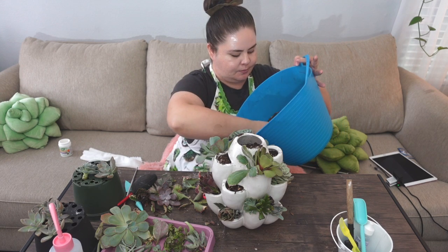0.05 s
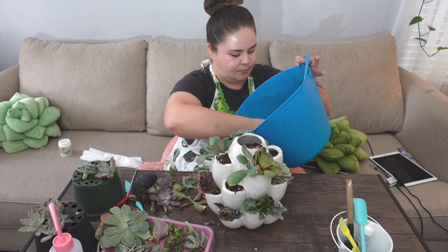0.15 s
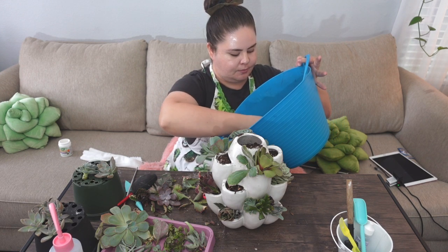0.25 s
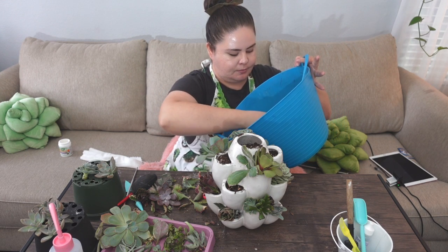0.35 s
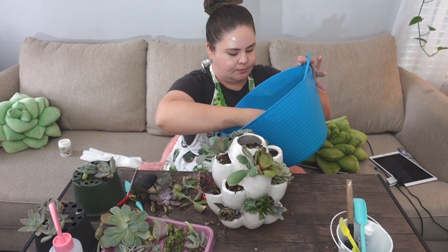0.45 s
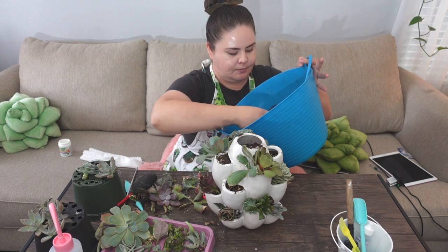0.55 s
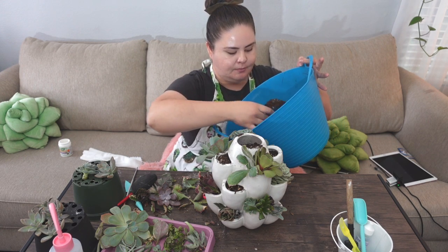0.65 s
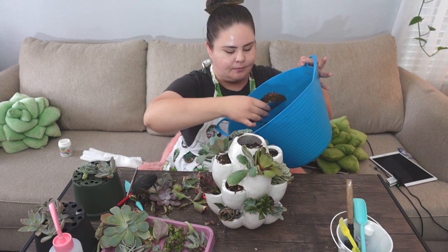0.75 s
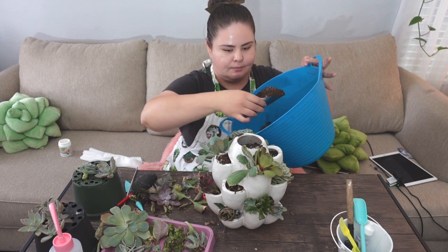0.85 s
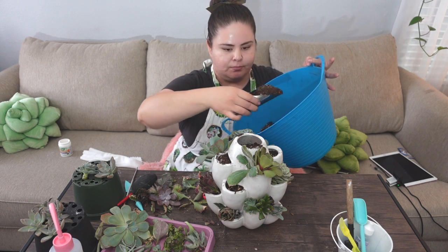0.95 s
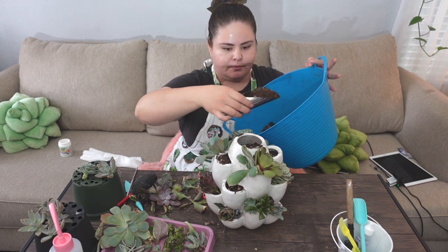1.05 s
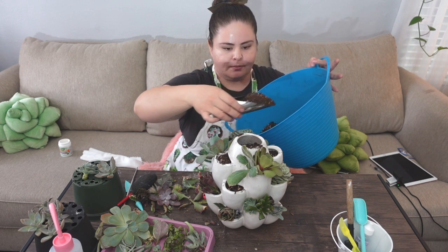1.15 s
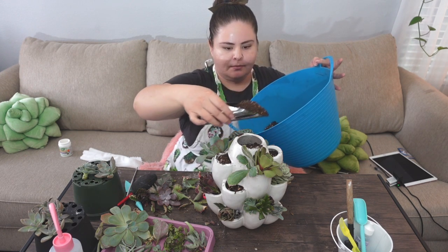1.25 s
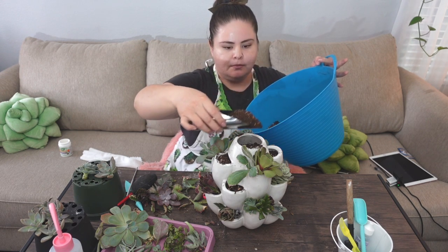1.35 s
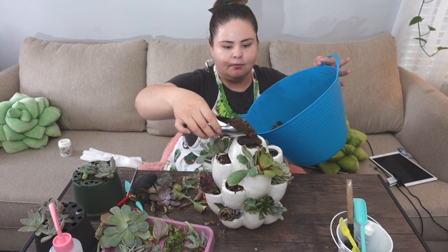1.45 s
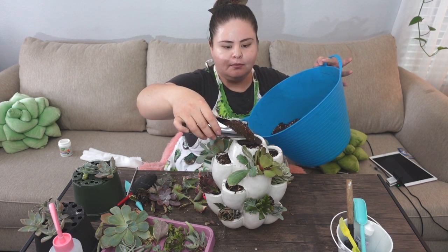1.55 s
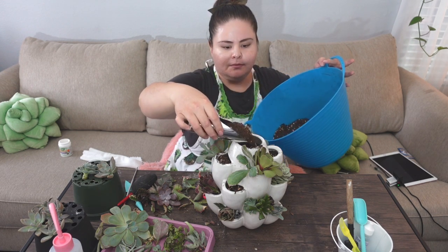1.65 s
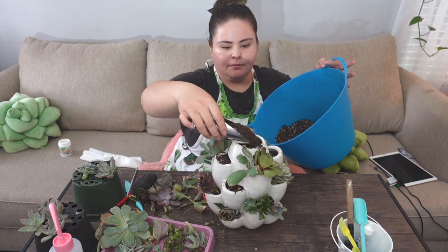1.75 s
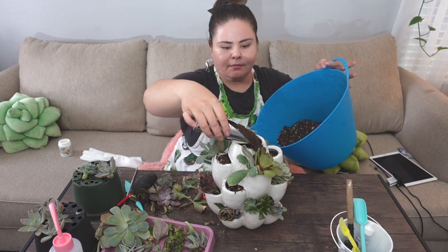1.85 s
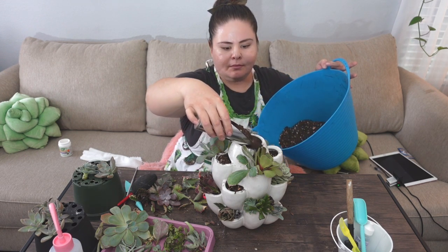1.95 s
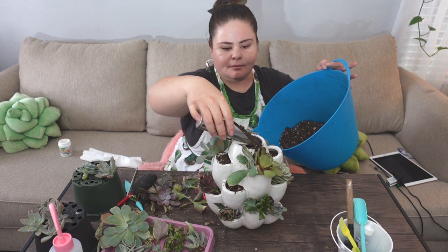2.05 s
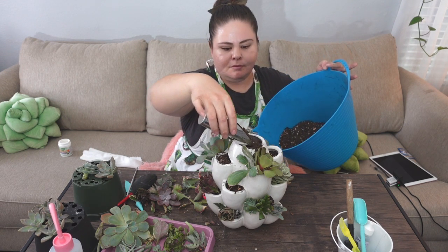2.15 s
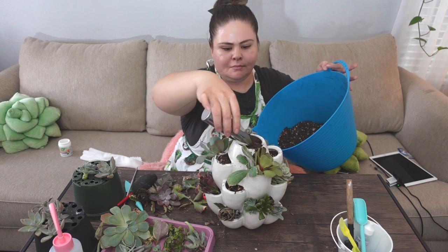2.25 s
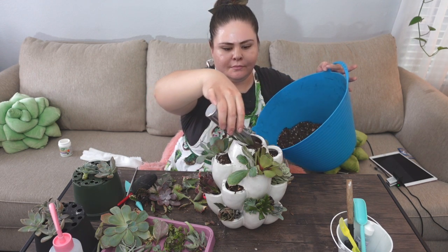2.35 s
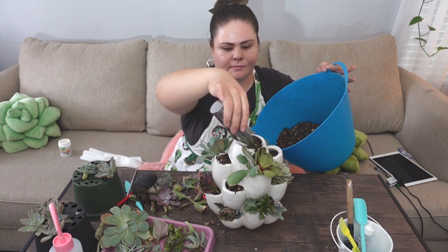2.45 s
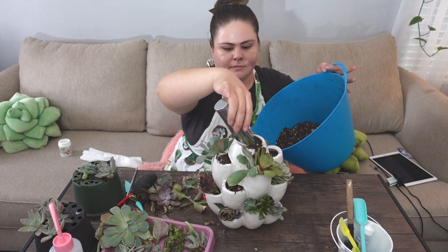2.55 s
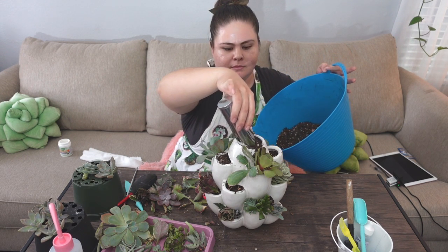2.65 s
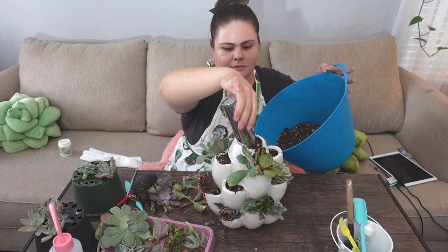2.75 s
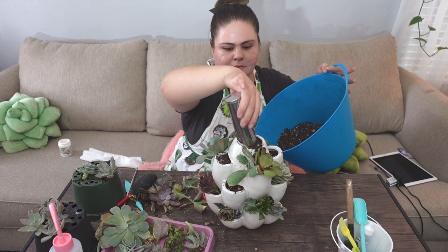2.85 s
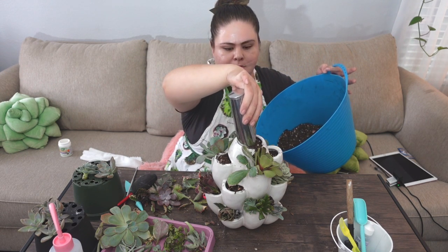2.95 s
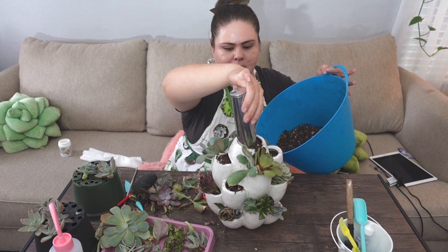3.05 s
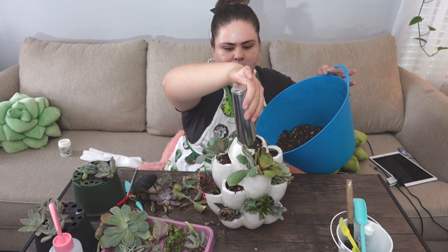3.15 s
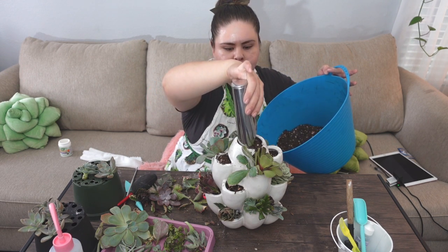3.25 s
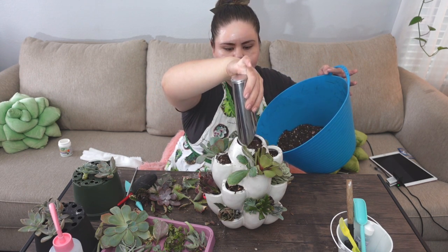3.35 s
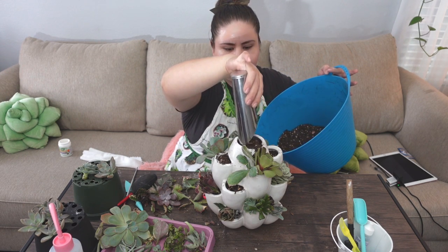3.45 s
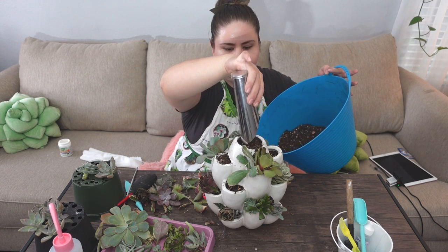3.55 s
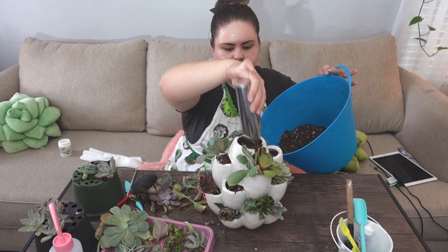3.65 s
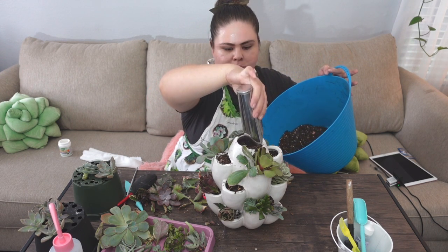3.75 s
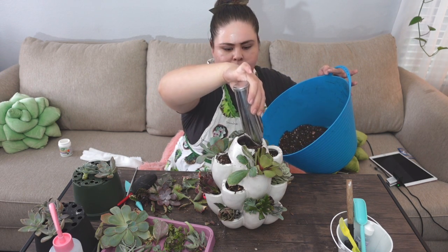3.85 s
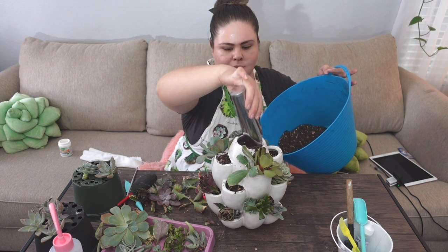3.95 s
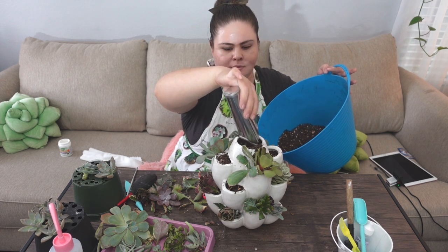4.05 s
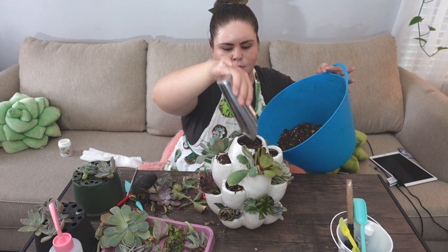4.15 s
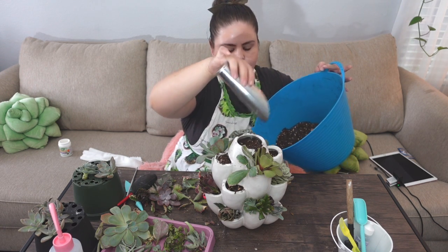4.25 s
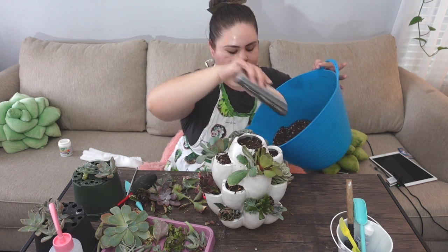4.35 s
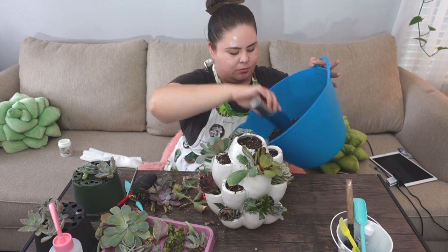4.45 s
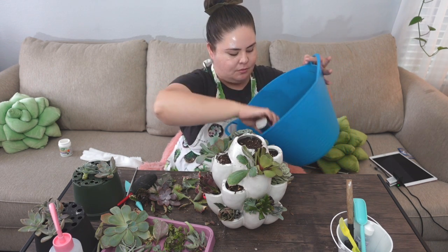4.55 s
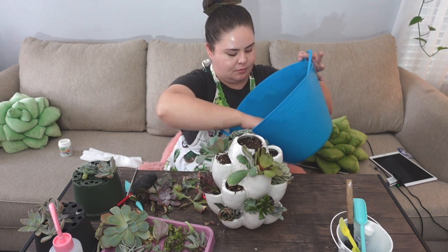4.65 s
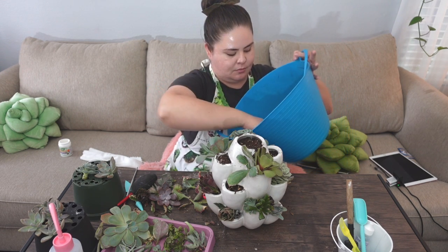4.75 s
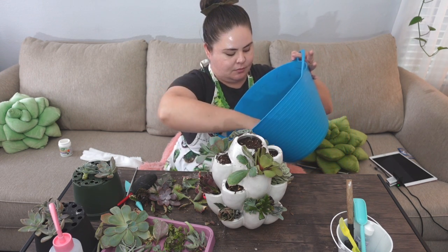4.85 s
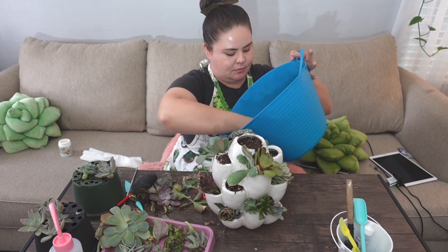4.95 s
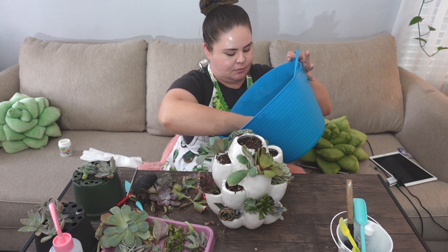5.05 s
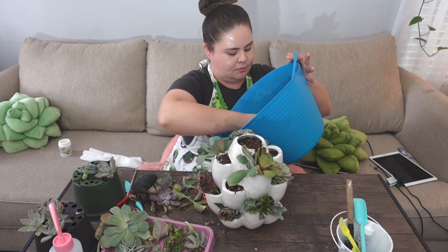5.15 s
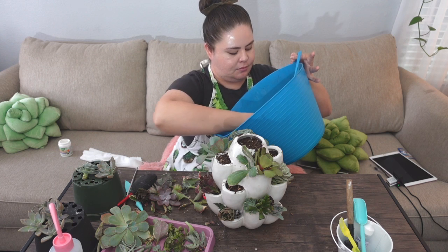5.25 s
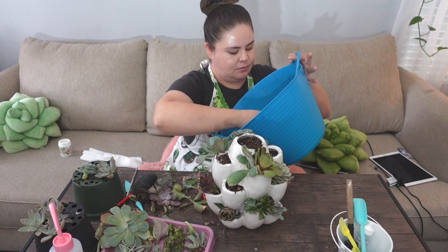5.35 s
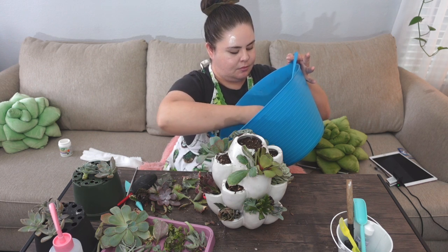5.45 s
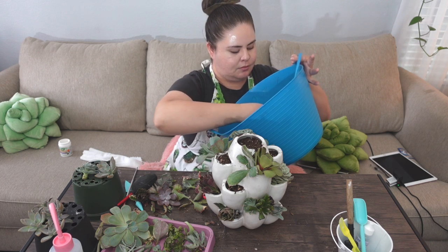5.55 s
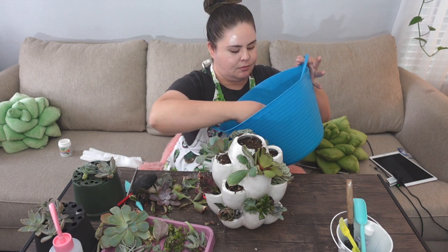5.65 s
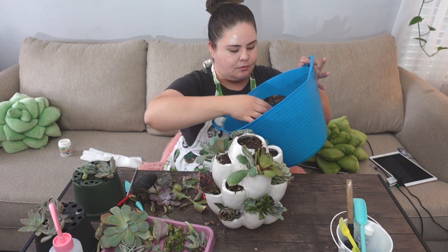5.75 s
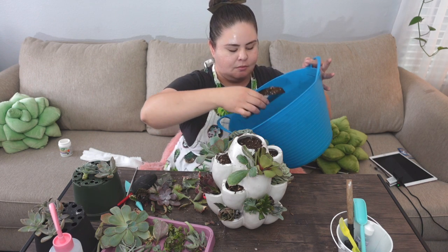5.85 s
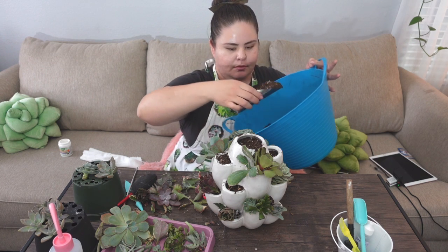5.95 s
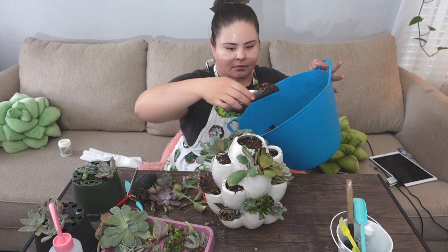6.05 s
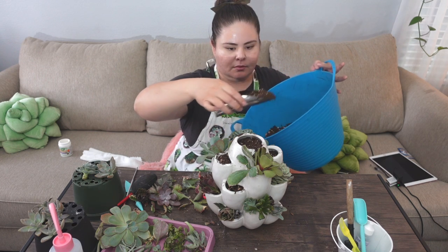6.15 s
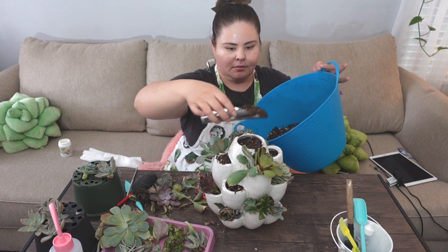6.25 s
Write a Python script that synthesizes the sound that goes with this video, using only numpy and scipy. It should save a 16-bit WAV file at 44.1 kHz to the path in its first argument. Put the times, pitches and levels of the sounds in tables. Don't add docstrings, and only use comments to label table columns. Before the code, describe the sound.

Indoors, a steel scoop digs soil from a booming soft plastic tub, rings faintly, taps a planter rim while emptying, and digs again.

```python
import sys
import numpy as np
from scipy import signal
from scipy.fft import rfft, irfft, next_fast_len
from scipy.io import wavfile

SR = 44100
rng = np.random.default_rng(int(sys.argv[2]) if len(sys.argv) > 2 else 0)


def boost(x):
    u = np.asarray(x, float) / 20
    return 10 ** u


def dump(signal):
    limited = np.clip(np.atleast_2d(signal).T, -1, 1)
    pcm = np.round(limited * 32767).astype(np.int16)
    wavfile.write(sys.argv[1], SR, pcm)


N = 277874


def at_hz(points, hz):
    point_hz, value = np.transpose(points)
    return np.interp(np.log(hz), np.log(point_hz), value)


def rms_one(x):
    return x / np.sqrt(np.mean(x ** 2) + 1e-20)


def high_pass(x, order, hz):
    return signal.sosfilt(signal.butter(order, hz, "high", fs=SR, output="sos"), x)


def drift(rate):
    r = np.exp(-80 * np.pi * rate / SR)
    slow = signal.lfilter([1], [1, -2 * r, r * r], rng.standard_normal(N // 40 + 2002))[2000:]
    return np.interp(np.arange(N) / 40, np.arange(len(slow)), rms_one(slow))


def ring(clicks, hz, t60):
    r = boost(-60 / (t60 * SR))
    w = 2 * np.pi * hz / SR
    return signal.lfilter([0, np.sin(w)], [1, -2 * r * np.cos(w), r * r], clicks + 1e-18)


def blip(clicks, hz, t60):
    return 2 * np.e * (1 - boost(-60 / (t60 * SR))) * ring(ring(clicks, hz, t60), hz, t60)


def strike(times, db, modes, voice=ring, smear_s=.0003, size=N, agree=0):
    out = np.zeros(size)
    luck = rng.standard_normal((len(times), len(modes), 3))
    for k, (hz, mode_db, t60) in enumerate(modes):
        clicks = np.zeros(size)
        late_s = smear_s * np.abs(luck[:, k, 2])
        at = ((np.asarray(times) + late_s) * SR).astype(int)
        sign = np.sign(luck[:, k, 1] + agree)
        clicks[at] = boost(db[:, k] + mode_db + 1.5 * luck[:, k, 0]) * sign
        out += voice(clicks, hz, t60)
    return out


def cracks(s, peak_db, low_db, mid_db, high_db, linger_s):
    pitches = np.geomspace(600, 14500, 22)
    colour = []
    for low, mid, high in zip(low_db, mid_db, high_db):
        spectrum = [(600, low - 6), (1000, low + 3), (2600, -11.5),
                    (5300, mid - 1.5), (11000, high - 3), (15000, high - 13)]
        colour.append(at_hz(spectrum, pitches))
    modes = [(hz, -6, 5 / hz + linger_s) for hz in pitches]
    return strike(s, peak_db[:, None] + np.array(colour), modes, blip, smear_s=linger_s / 5, agree=.9)


def grains(per_s, spread_db, clump_db):
    born = rng.random(N) < per_s * boost(clump_db * drift(25)) / SR
    size = boost(spread_db * np.minimum(rng.exponential(1, N), 5))
    return rms_one(born * size * rng.choice([-1, 1], N))


def body(clicks, modes, longest_s):
    out = np.zeros(N)
    for hz, db, t60 in modes:
        out += boost(db + 3 * drift(6)) * blip(clicks, hz, min(t60, longest_s) / 1.5) / t60
    return rms_one(out)


def crackle(clicks, spectrum, cycles):
    pitches = np.geomspace(spectrum[0][0], 15500, 20)
    dealt = rng.integers(0, 20, N)
    out = np.zeros(N)
    for k, hz in enumerate(pitches):
        out += boost(at_hz(spectrum, hz)) * hz * blip(clicks * (dealt == k), hz, cycles / hz)
    return rms_one(out)


def swells(rows, over_db=0, lag_s=.004):
    s, db, rise_ms, fall_ms = np.array(rows)[:, :4].T[:, :, None]
    ms = 1000 * (np.arange(0, N + 32, 32) / SR - s - lag_s * (s > 0))
    away = np.where(ms < 0, -ms / np.abs(rise_ms), ms / np.abs(fall_ms))
    db = db + np.reshape(over_db, (-1, 1)) - 20 * away
    level = np.sqrt(np.sum(boost(db) ** 2, axis=0))
    return np.interp(np.arange(N) / 32, np.arange(ms.shape[1]), level)


def add(out, s, sound):
    at = int(s * SR)
    out[at:at + len(sound)] += sound[:N - at]


def bands(shape_of, alike_at, length):
    out = 0
    edges = 35 * 2 ** np.arange(0, 9.1, .4)
    white = rng.standard_normal((2, 2, length))
    for k, (low, high) in enumerate(zip(edges, edges[1:])):
        band = signal.butter(2, [low, high], "band", fs=SR, output="sos")
        mid, side = signal.sosfilt(band, white[k % 2])
        hz = np.sqrt(low * high)
        alike = np.clip(alike_at(hz), 0, 1)
        pair = np.sqrt(1 + alike) * mid + np.sqrt(1 - alike) * side * [[1], [-1]]
        out = out + shape_of(hz) * pair
    return out


# time of the peak in seconds, crunch level in dB, rise over 20 dB
# in ms, fall over 20 dB in ms, grit on steel in dB over the crunch.
SHOVES = [(0.0, -25.5, 5, 33, -13), (0.038, -44, 20, 127, -7.5), (0.26, -60.5, 283, 145, 0),
          (0.462, -57, -2, 64, 6), (0.61, -64, 107, 27, 1.5), (0.891, -65, -3, 63, 7),
          (0.974, -61, 15, 302, -1), (1.28, -76, 28, 1, -39), (1.631, -45, 6.5, 77, -8),
          (1.8, -66, 300, 103, -2.5), (4.588, -38, 5.5, 139, -2), (4.671, -44.5, 46, 30, 5.5),
          (4.695, -53, 10, 171, 7.5), (4.845, -50.5, 42, 209, 7), (4.901, -42.5, 135, 265, -5),
          (5.275, -57.5, 456, 80, -8), (5.36, -74.5, 99, 207, 20.5), (5.434, -65.5, 48, 250, 6),
          (5.5, -60.5, 75, 18, 7)]
# time of the peak in seconds, level in dB, rise and fall over 20 dB
# in ms.
FLEXES = [
    (0.0, -38, 1, 117),
    (0.26, -67, 399, 47),
    (1.656, -76, 17, 71),
    (1.82, -71, 100, 40),
    (4.59, -27, 5, 200),
    (4.672, -23, 20, 35),
    (4.7, -47, 25, 73),
    (4.902, -39.5, 35, 168),
    (5.28, -56, 505, 48),
]
# mode in Hz, level in dB, T60 in seconds.
WALL_MODES = [(606, -26.5, 0.06), (780, -15, 0.038), (910, -0.5, 0.019), (1088, 0.5, 0.017),
              (1213, 2, 0.0089), (1438, 5.5, 0.014), (1550, -12, 0.025), (1795, 3, 0.018),
              (2153, -9, 0.015)]
# mode in Hz, level in dB, T60 in seconds.
BOOM_MODES = [(237, -4, 0.06), (287, 4.5, 0.14), (323.5, 10.5, 0.14), (377, 3.5, 0.07), (397, -2.5, 0.033),
              (460, -4.5, 0.027), (501, -12.5, 0.068)]
# frequency in Hz, level in dB per Hz.
GRIT_SPECTRUM = [(240, -41), (400, -26), (460, -81), (666, -20), (1730, 2), (3160, 0), (3520, -1),
                 (7510, -6), (16000, -27.5)]
# mode in Hz, level in dB, T60 in seconds.
HELD_STEEL = [(2690, -5, .028), (3590, -11, .012), (4500, -7, .02), (4650, -8, .022), (4870, -8, .03),
              (5240, -6, .02), (5550, -7, .014), (6200, -8, .014), (6690, -4, .02), (7250, -8, .02),
              (7900, -9, .016), (8720, -9, .018), (10200, -13, .014), (10800, -13, .02)]


def digging():
    wall = body(grains(5000, 2.8, 2.0), WALL_MODES, .014)
    boom = body(grains(900, 2.5, 2.5), BOOM_MODES, .1)
    grit = grains(16000, 2.2, 2.0)
    bright = crackle(grit, GRIT_SPECTRUM, cycles=7.6) + boost(-12.0) * body(grit, HELD_STEEL, 0.013)
    grit_db = np.array(SHOVES)[:, 4]
    out = boost(-4.0) * swells(SHOVES) * wall
    out += boost(-13.5) * swells(FLEXES) * boom
    return out + boost(-2.5) * swells(SHOVES, grit_db) * bright


# frequency in Hz, level in dB per Hz.
HISS_SPECTRUM = [(24, -79), (40, -87), (215, -23.5), (237, -16.5), (556, -13.5), (733, -4), (1070, -3.5),
                 (1370, -9.5), (1760, 1), (2260, -10.5), (3470, -12), (3930, -12.5), (16000, -22)]
# frequency in Hz, left-right likeness up to 1 (below 0 counts as 0).
HISS_LIKENESS = [(60, 0.45), (180, 0.52), (550, -0.4), (1650, -0.51), (4970, -0.53), (15000, 0.82)]


def hiss():
    noise = bands(lambda hz: boost(at_hz(HISS_SPECTRUM, hz)), lambda hz: at_hz(HISS_LIKENESS, hz), N)
    return boost(-64.5) * rms_one(noise)


# centre in Hz, width in Hz, level in dB.
DUCT = [(760, 99, 1.5), (1392, 137, 0), (1958, 40, 0.5), (2238, 220, 6)]


def fan():
    mid, side = rng.standard_normal((2, N))
    air = mid + side * [[1], [-1]]
    out = 0
    for hz, width, db in DUCT:
        out = out + boost(db + 0.98 * drift(3.7)) * rms_one(blip(air, hz, 1.97 / width))
    return boost(-65) * rms_one(out)


# time in seconds, level in dB, rise and fall over 20 dB
# in ms.
RUMBLES = [
    (0.0, -99, 500, 900),
    (1.9, -102, 2495, 2000),
    (4.78, -99, 400, 897),
    (6.3, -104, 500, 500),
]


def low_rumble():
    road = rms_one(blip(rng.standard_normal(N), 92, 0.041))
    return (boost(-108) + swells(RUMBLES)) * road


def thuds(rows):
    out = np.zeros(N)
    click = np.arange(SR // 4) == 0
    for s, db, hz, t60 in rows:
        add(out, s, boost(db - 6) * blip(click, hz, abs(t60)))
    return high_pass(out, 4, 170)


# time in seconds, peak in dB, pitch in Hz, T60 in seconds.
JAMS = [(0.002, -33, 1323, 0.035), (0.004, -36, 1150, 0.027), (0.002, -42, 744, 0.054),
        (0.002, -40.5, 1620, 0.017), (0.021, -36, 1416, 0.041), (0.03, -43, 1034, 0.039),
        (0.045, -43, 870, 0.044), (0.464, -40, 1480, 0.009), (4.589, -21.5, 1075, 0.016),
        (4.6, -37, 860, .025), (4.59, -25, 2180, 0.013), (4.592, -26, 760, 0.015), (4.663, -28, 610, 0.012),
        (4.6675, -33, 340, 0.024), (4.669, -28, 1550, 0.013), (4.6675, -21.5, 523, 0.016),
        (4.6675, -23, 712, 0.016), (4.668, -23, 965, 0.011), (4.695, -33, 319, 0.031),
        (4.8325, -36, 710, 0.015), (4.85, -35, 1230, 0.011), (4.902, -42, 780, 0.016),
        (4.908, -32.5, 706, 0.023), (4.925, -39, 933, 0.026), (5.284, -38, 1190, 0.011),
        (5.429, -45, 1160, 0.014), (5.482, -50, 910, 0.021)]


def jams():
    return thuds(JAMS)


# time in seconds, rms in dB, rise and fall over 20 dB in ms, centre in Hz.
RASPS = [(.012, -43, 40, 190, 1070), (.172, -56, 6, 60, 5500), (4.835, -50, 4, 40, 1300),
         (3.26, -66, 200, 200, 4200), (4.596, -41, 8, 70, 1080), (4.596, -48, 8, 90, 4300),
         (4.9, -55, 90, 120, 2700), (3.965, -50, 15, 90, 4700), (2.77, -70, 150, 250, 4900),
         (2.8, -74, 200, 200, 8800), (2.885, -62, 90, 170, 5200), (2.9, -72, 120, 150, 11500),
         (3.38, -58, 8, 80, 7900), (4.645, -46, 80, 60, 780), (4.73, -52, 80, 120, 760),
         (4.99, -53, 60, 120, 1200), (5.34, -62, 12, 150, 3700)]


def rasping():
    grit = [grains(7000, 3.0, 2.5), grains(7000, 3.0, 2.5)]
    out = np.zeros(N)
    for k, row in enumerate(RASPS):
        hz = row[4]
        out += swells([row]) * rms_one(blip(grit[k % 2], hz, 18 / hz))
    return out


# time in seconds, peak in dB, weight (under 1.5 kHz) in dB,
# hardness (over 8 kHz) in dB.
LUMPS = [(0.096, -33.5, -20, -25), (0.441, -40, -16, -24), (0.466, -37.5, -30.5, -25),
         (0.892, -32.5, -17, -33), (0.976, -33.5, -19.5, -36), (1.014, -33.5, -26, -47),
         (1.13, -42, -24, -30), (1.223, -54.5, -41, -28), (4.589, -16, -20, -32), (4.595, -35, -1, -30),
         (4.603, -30, -10, -30), (4.668, -31, -16, 2), (4.697, -34, -24, 0), (4.833, -36, -14, -14),
         (4.848, -37, -22, 3), (4.852, -47, -12, -8), (4.898, -24, -18, -17), (4.903, -27, -11, -19),
         (4.928, -32, -16, -15), (5.285, -32, -21.5, -35), (5.296, -41, -35, -30), (5.425, -45, -45, -30),
         (5.431, -38, -34, -12)]
# delay in seconds, level in dB.
TUB_ECHOES = [(.0045, -4), (.0076, -9), (0.012, -6.5)]


def lumps():
    s, db, low, high = np.transpose(LUMPS)
    edge_db = np.minimum(-21.5 - 0.51 * low, -3)
    direct = cracks(s, db, low, edge_db, high, linger_s=.001)
    out = direct.copy()
    for late, echo_db in TUB_ECHOES:
        out += boost(echo_db) * np.roll(direct, int(late * SR))
    return high_pass(out, 4, 620)


# time in seconds, peak in dB, hardness (over 8 kHz) in dB.
CRUMBS = [
    (.166, -39, 1.5),
    (.521, -49, -0.5),
    (.777, -59, 6),
    (1.944, -55.5, -1),
    (2.302, -43.5, -20),
    (2.499, -52.5, -16),
    (4.561, -59.5, 1),
    (5.333, -35, -12),
]


def crumbs():
    s, db, high = np.transpose(CRUMBS)
    weight_db, edge_db = np.full(len(s), -17.0), np.full(len(s), 2.5)
    return high_pass(cracks(s, db, weight_db, edge_db, high, linger_s=.003), 4, 620)


# time in seconds, peak in dB, lowest mode in dB,
# brightness in dB per octave, time in seconds when the hand damps it.
CHIMES = [
    (.277, -62, -4, 9, .46),
    (.293, -53.5, -8, 15, 0.4),
    (.315, -52, -8, 3, .4),
    (0.344, -54.5, -8, 3, 0.46),
    (.425, -59, 1.5, 0, 0.46),
    (3.137, -78, 7, -8, 2.57),
    (5.454, -51.5, 6.5, -12, 5.52),
    (5.458, -38, -9, -0.5, 5.53),
    (5.515, -54, -12, 0, 5.6),
]
# mode in Hz, level in dB, T60 in seconds, twin mode offset in Hz.
FREE_STEEL = [(2665, -4, .07, 14), (4868, 0, .085, -30), (7555, -9, .06, -34), (8518, -7, .065, 42),
              (10785, -12, .06, -55), (12580, -16, .04, 40), (14530, -18, .035, -60)]


def chimes():
    out, t = np.zeros(N), np.arange(SR // 2) / SR
    modes = [row[:3] for row in FREE_STEEL]
    twins = [(hz + away, mode_db - 10, t60) for hz, mode_db, t60, away in FREE_STEEL]
    octaves = np.log2(np.array(FREE_STEEL)[None, :, 0] / 5000)
    for s, peak_db, lowest_db, tilt_db, damped_s in CHIMES:
        db = peak_db + tilt_db * octaves
        db[0, 0] += lowest_db
        db[0, 2] += 2.5 - 0.11 * lowest_db
        damping = boost(-12 * np.clip((s + t - damped_s) / .022, 0, 1))
        pair = strike([0], db, modes, size=len(t), agree=9) + strike([0], db, twins, size=len(t))
        add(out, s, damping * pair)
    return out * boost(2.5 * drift(40))


# time in seconds, rms in dB, rise and fall over 20 dB in ms, mode in Hz.
SINGS = [(.325, -67, 50, 130, 4868), (.435, -69, 30, 60, 4868), (.32, -66, 40, 150, 7555),
         (.432, -70, 60, 60, 7555), (.315, -72, 60, 250, 2665), (.432, -67, 15, 60, 2665),
         (3.16, -74, 40, 250, 2665), (3.235, -70, 120, 90, 2665), (3.35, -72, 80, 250, 4868),
         (3.7, -62, 15, 123, 2665), (3.79, -66, 20, 80, 2665), (3.75, -60, 120, 150, 945),
         (3.87, -63, 40, 120, 4868), (5.512, -55, 200, 25, 2665), (5.525, -59, 120, 130, 4868),
         (5.625, -69, 60, 120, 4868), (5.53, -66, 80, 70, 7555)]
SING_HZ = np.array([945, 2665, 4868, 7555])


def singing():
    t = np.arange(N) / SR
    tones = []
    for hz in SING_HZ:
        flutter = np.sqrt(2) * boost(4.5 * drift(45))
        tones.append(flutter * np.sin(2 * np.pi * hz * t + 1.8 * drift(15)))
    out = np.zeros(N)
    for row in SINGS:
        nearest = np.argmin(np.abs(np.log(SING_HZ) - np.log(row[4])))
        out += swells([row]) * tones[nearest]
    return out


# time in seconds, peak in dB, rim, planter belly and steel ring in dB.
KNOCKS = [
    (1.633, -30.5, -1.5, -24, -39),
    (3.684, -27, -10.5, -12.5, -10),
    (3.945, -20, -11.5, -20.5, -14),
]
# mode in Hz, level in dB, T60 in seconds.
BELLY = [(843, -2, 0.058), (922, 5, 0.033), (974, -1.5, 0.052)]
# mode in Hz, level in dB, T60 in seconds.
RIM = [(1495, -8, 0.023), (1860, -27.5, 0.014), (1990, -8, 0.031), (2100, 0.5, 0.036), (2170, 1, 0.0074),
       (2740, -4, 0.011), (3720, -9, .025), (4600, -15, 0.014), (5520, -14, 0.028), (6300, -15, 0.02)]


def knocks():
    s, peak_db, rim_db, belly_db, steel_db = np.transpose(KNOCKS)
    high_db = steel_db + 9.5
    out = cracks(s, peak_db, belly_db - 6.5, high_db / 2, high_db, linger_s=.002)
    for share_db, modes in [(belly_db - 0.5, BELLY), (rim_db, RIM), (steel_db, HELD_STEEL)]:
        out += strike(s, np.outer(peak_db + share_db, np.ones(len(modes))), modes)
    return high_pass(out, 4, 620)


# time in seconds, peak in dB, pitch in Hz.
BUMPS = [
    (1.634, -61.5, 221),
    (1.759, -76.5, 212),
    (3.041, -80, 188),
    (3.685, -61.5, 334),
    (3.946, -80, 305),
    (4.667, -46, 272),
]


def bumps():
    return thuds([(s, db, hz, .06) for s, db, hz in BUMPS])


# time in seconds, level in dB,
# rise and fall over 20 dB in ms, steel ring in dB over it.
SLIPS = [(2.3, -52.5, 5, 139, -3), (2.495, -60, 170, 318, -12), (2.78, -61.5, 220, 400, -4),
         (2.882, -56, 58, 222, -2), (3.135, -50.5, 12, 50, 0), (3.16, -58, 31, 400, -19),
         (3.24, -49, 20, 58, -5), (3.303, -47.5, -6, 67, -4), (3.373, -45.5, -1, 50, -23),
         (3.62, -63, 25, 33, -3), (3.649, -42, 8, 20, -20), (3.683, -42.5, 12, 94, 4.5),
         (3.843, -40, 12, 17, 6.5), (3.93, -47, 150, 2, -15), (3.947, -31, 11, 40, -2)]
# frequency in Hz, level in dB per Hz.
SLIDE_SPECTRUM = [(1470, -62), (2500, -22), (2620, 11.5), (3080, -15), (3410, -1.5), (8930, -2),
                  (14900, -22), (16000, -44)]


def pouring():
    grit = grains(9000, 3.5, 2.0)
    skid = crackle(grit, SLIDE_SPECTRUM, cycles=7.0)
    hum = body(grit, HELD_STEEL, .022)
    hum_db = np.array(SLIPS)[:, 4]
    return boost(-7.5) * (swells(SLIPS) * skid + swells(SLIPS, hum_db) * hum)


# time in seconds, peak in
# dB, favoured pitch in Hz, level over 8 kHz in dB, planter belly in dB.
GRAZES = [(2.706, -58, 5300, -14, -30), (2.885, -49, 5130, -6, -24), (2.917, -52, 5000, -6, -15),
          (2.943, -47, 5940, -8, -32), (3.137, -46.5, 7900, -11, -20), (3.188, -52, 6900, 5, -30),
          (3.2424, -43.5, 6600, -8, -19), (3.252, -50, 6800, -6, -27), (3.304, -43, 6700, -12, -15.5),
          (3.315, -50, 5470, -8, -30), (3.329, -43, 6500, -14, -25), (3.337, -50, 7000, -8, -28),
          (3.375, -39, 8200, -2, -38), (3.623, -48.5, 6600, -16, -35), (3.654, -36, 6850, 4.5, -39),
          (3.777, -39, 4530, -10, -16.5), (3.8315, -35.5, 4600, 4, -20.5), (3.8406, -42, 4600, 3, -15),
          (3.847, -29.5, 6700, 1, -34.5), (3.955, -29, 4600, -12, -29), (3.961, -33, 5170, -11, -20),
          (3.993, -33, 6500, 1, -21.5)]


def grazes():
    s, peak_db, hz, high_db, belly_db = np.transpose(GRAZES)
    off = np.log2(np.array(HELD_STEEL)[None, :, 0] / hz[:, None]) / 0.13
    tick = high_pass(cracks(s, peak_db - 1.5, belly_db - 1, high_db / 2, high_db, linger_s=0.001), 2, 3000)
    steel_db = (peak_db - 3.5)[:, None] - 6 * np.minimum(off ** 2, 3)
    steel = strike(s, steel_db, [(f, 0, t60 / 2) for f, _, t60 in HELD_STEEL])
    return tick + steel + strike(s, np.outer(peak_db + belly_db, np.ones(len(BELLY))), BELLY)


# frequency in Hz, T60 in seconds.
ROOM_T60 = [(150, 0.12), (700, 0.45), (2000, 0.52), (6000, 0.38), (14000, 0.35)]
# frequency in Hz, level in dB.
ROOM_COLOUR = [(300, 0), (700, 0.5), (2000, -0.5), (6000, 0.5), (14000, 3)]
# frequency in Hz, left-right likeness.
ROOM_LIKENESS = [(350, 0.96), (600, 0.78), (1500, 0.47), (8000, 0.35), (14000, 0.7)]
# delay in seconds, level in dB.
ECHOES = [(.0045, -21), (.0078, -49), (0.0123, -20.5)]
# frequency in Hz, left minus right in dB.
PAN = [(300, 0), (700, -2.5), (2000, -1), (6000, -1.5), (14000, 1)]


def room(x):
    t = np.arange(SR // 2) / SR
    tail = bands(lambda hz: boost(at_hz(ROOM_COLOUR, hz) - 60 * t / at_hz(ROOM_T60, hz)),
                 lambda hz: at_hz(ROOM_LIKENESS, hz), len(t))
    tail *= 1 - np.exp(-t / 0.00057)
    response = boost(-4) * rms_one(tail) / np.sqrt(len(t))
    response[:, 0] += 1
    for late, db in ECHOES:
        response[:, int(late * SR)] += boost(db)
    wet = signal.fftconvolve(x[None], response)[:, :N]
    size = next_fast_len(N)
    lean_db = at_hz(PAN, np.arange(size // 2 + 1) * SR / size + 1) / 2
    return irfft(rfft(wet, size) * boost([lean_db, -lean_db]), size)[:, :N]


def scene():
    small = digging() + rasping() + lumps() + crumbs() + knocks() + pouring() + grazes()
    small, chime = high_pass(np.array([small, chimes() + singing()]), 3, 260)
    in_room = room(small + jams() + bumps() + boost(-8.0) * chime)
    return in_room + boost([[-3], [-1.5]]) * chime + hiss() + fan() + low_rumble()


def top_cut(x):
    return signal.sosfilt(signal.butter(12, 16140, fs=SR, output="sos"), x)


def record(dry):
    x = high_pass(dry, 6, 100)
    x = signal.sosfilt(signal.cheby2(10, 60, 16800, fs=SR, output="sos"), x)
    return top_cut(x)


dry = scene()
out = record(dry)
dump(out)
```